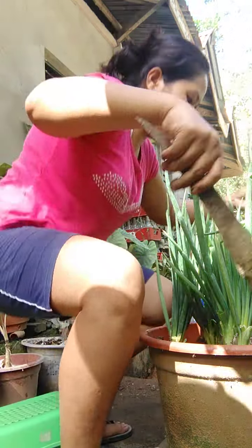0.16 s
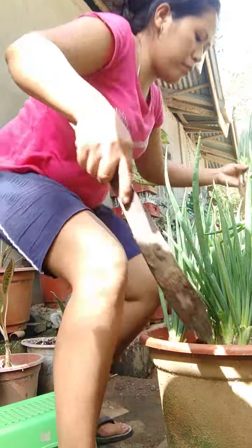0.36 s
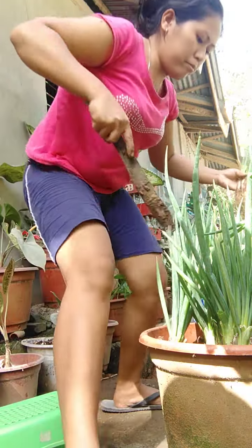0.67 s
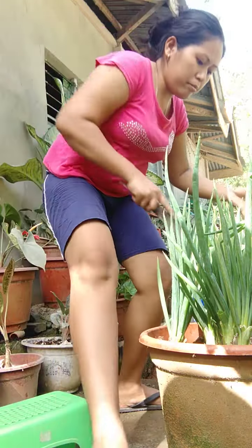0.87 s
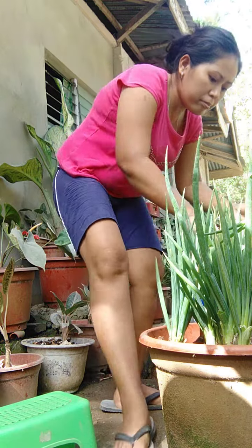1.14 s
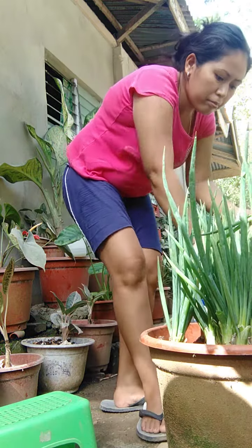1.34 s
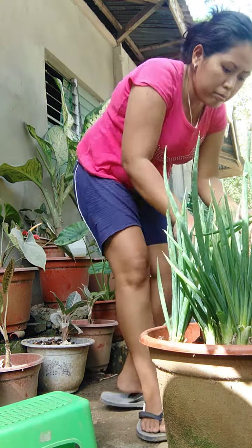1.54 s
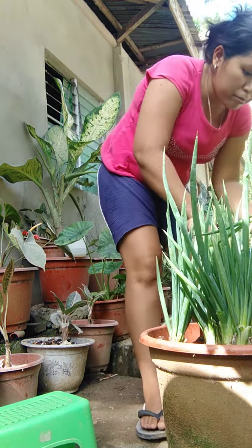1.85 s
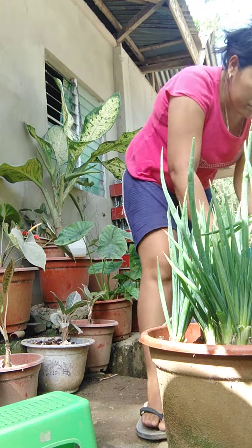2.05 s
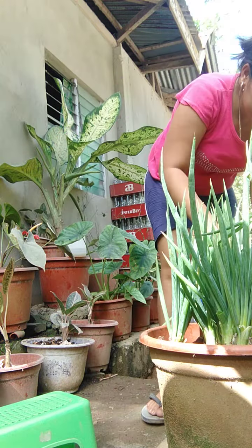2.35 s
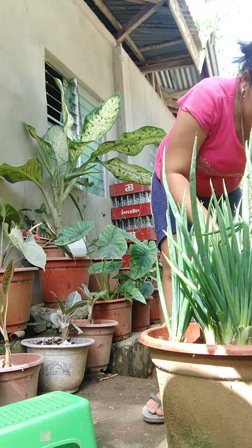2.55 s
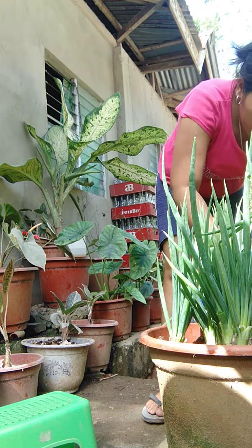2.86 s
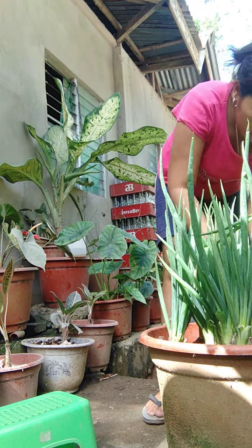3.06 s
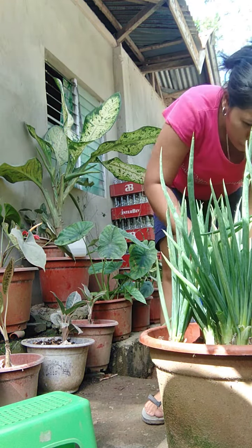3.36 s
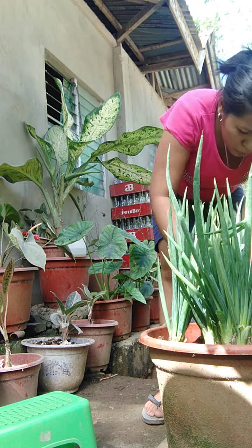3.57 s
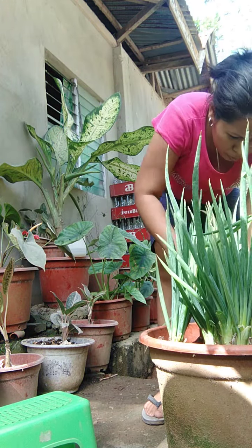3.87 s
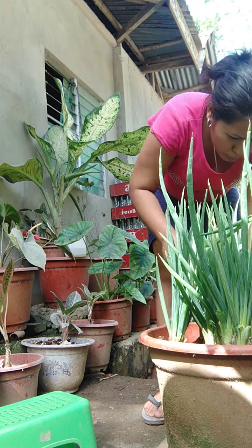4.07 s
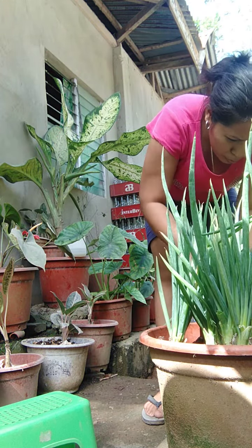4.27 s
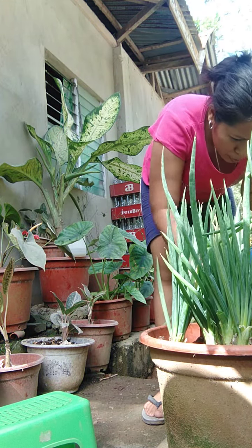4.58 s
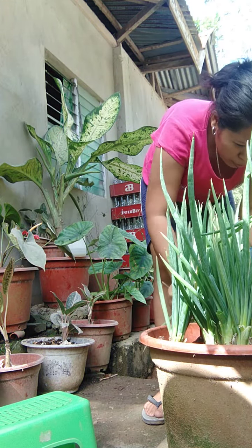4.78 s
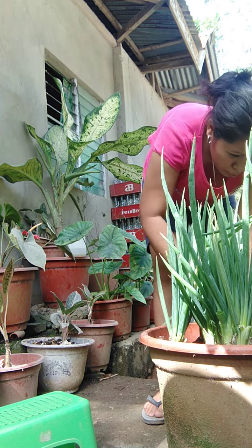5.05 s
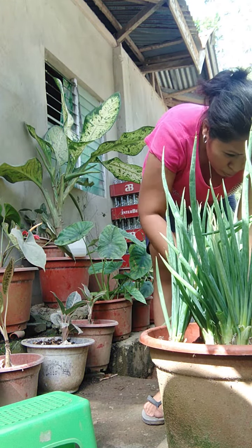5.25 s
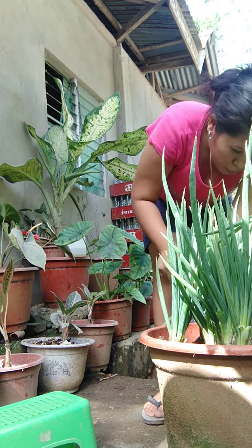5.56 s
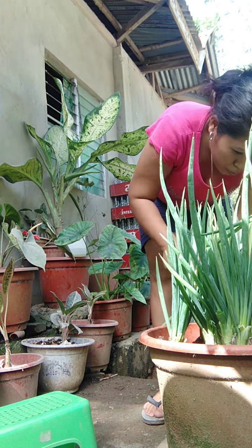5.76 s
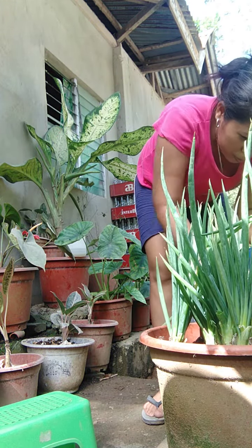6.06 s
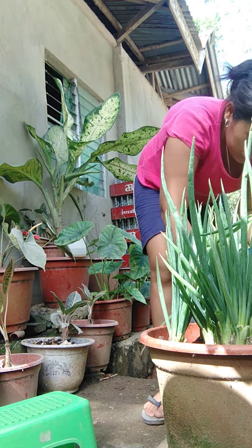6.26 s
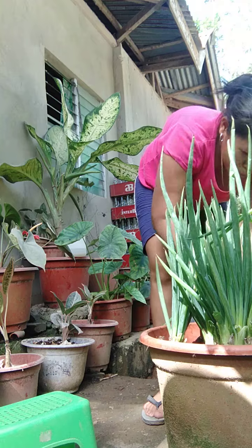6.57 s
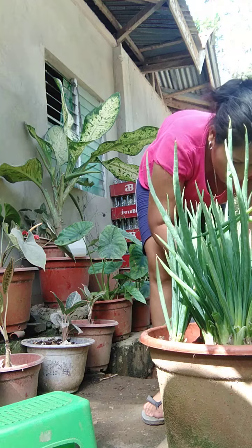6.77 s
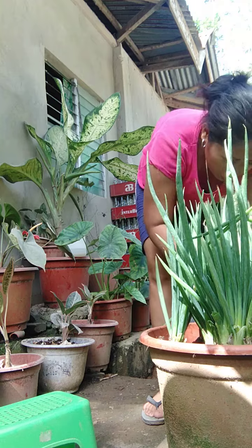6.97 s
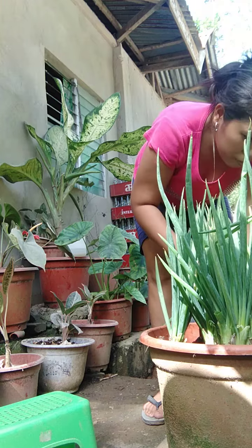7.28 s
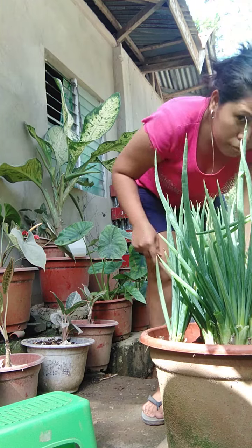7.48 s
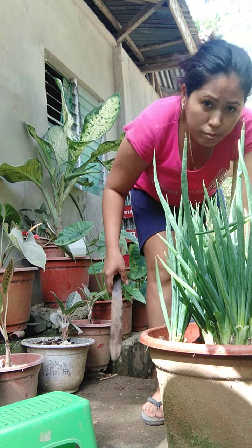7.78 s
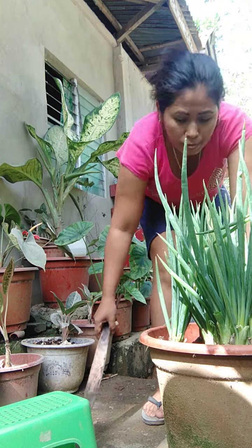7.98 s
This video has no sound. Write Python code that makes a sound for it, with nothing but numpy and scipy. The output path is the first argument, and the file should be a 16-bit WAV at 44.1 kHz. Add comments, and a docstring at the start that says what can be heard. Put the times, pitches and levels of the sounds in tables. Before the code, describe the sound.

A lumpy low exhaust chug, about twenty-eight beats a second, approaches outdoors, passes with rattly pops and rolling hiss, then drops in speed and recedes. A distant smooth motor gradually climbs. Close by, plant stalks crackle and snap early on and again near the end, lightly echoing off a wall. Brief thin bird whistles and a low hum sit beneath. The phone microphone sounds muffled and noise-suppressed between events.

```python
"""A slow, thumping engine passes a garden beside a house and throttles down: a train of exhaust pulses rings
rows of pipe resonances, with noise for valve clatter and tyres. Further off a smoother engine, a few gliding
sine orders, gathers speed. Close to the microphone leaves rustle (crackling noise) and a few dry snaps
(short noise bursts over a knock) ring off the wall; small birds chirp in gliding whistles over a low hum and
hazy exhaust roar. A phone with noise suppression listens."""
import sys
import numpy as np
from scipy import signal
from scipy.fft import rfft, irfft, next_fast_len
from scipy.io import wavfile
from scipy.ndimage import uniform_filter1d, minimum_filter1d, map_coordinates

SR = 44100
rng = np.random.default_rng(int(sys.argv[2]) if len(sys.argv) > 2 else 0)


def persist_wave(psi):
    """Save psi, clipped to +-1, as 16-bit WAV."""
    counts = np.round(np.clip(psi, -1, 1) * 32767).astype(np.int16)
    wavfile.write(sys.argv[1], SR, np.atleast_2d(counts).T)


def voltage_ratio(level):
    """Linear amplitude factor for a level in decibels (scalar or array-like)."""
    return 10 ** (np.asarray(level, float) / 20)


N = 358312

# colour of leaves and stalks: hz, relative density_db (dB per Hz)
LEAF_COLOUR = [(880, -53.5), (1500, 9.5), (1920, 3.5), (2330, 6.5), (3010, 1), (4070, 8.5), (6520, 3.5),
               (7400, 8.5), (10000, -5.5), (15600, -15)]


def unit(x):
    """Bring to rms 1."""
    return x / np.sqrt(np.mean(x ** 2) + 1e-20)


def along(points, hz):
    """Read (Hz, value) points on a log frequency axis."""
    f, v = np.transpose(points)
    return np.interp(np.log(hz + 1), np.log(f + 1), v)


def curves(rows):
    """One value per sample for each column after the time."""
    s, *cols = np.transpose(rows)
    return [np.interp(np.arange(N) / SR, s, c) for c in cols]


def wobble(rate):
    """A smooth random curve, rate knots a second."""
    knots = rng.standard_normal(int(N * rate / SR) + 4)
    return map_coordinates(knots, [np.arange(N) * rate / SR])


def filtered(x, response):
    """x times a complex response of frequency."""
    m = next_fast_len(len(x) + SR // 2)
    return irfft(rfft(x, m) * response(np.fft.rfftfreq(m, 1 / SR)), m)[:len(x)]


def modes(table):
    """Causal response of a row of resonances (Hz, width Hz, dB), alternating in sign."""
    def response(f):
        total = 0
        for k, (centre, width, db) in enumerate(table):
            total = total + (-1) ** k * voltage_ratio(db) * 1j * f * width / (centre * centre - f * f + 1j * f * width)
        return total
    return response


def highpass(f, corner_hz):
    """First-order response that thins out everything below the corner."""
    return 1j * f / (corner_hz + 1j * f)


def hiss(spectrum, n=N):
    """Coloured noise of rms 1."""
    return unit(filtered(rng.standard_normal(n), lambda hz: voltage_ratio(along(spectrum, hz))))


def patchy(x, depth_db):
    """x with random patches of gain, some 250 Hz by 100 ms, brought to rms 1."""
    z = signal.stft(x, nperseg=512)[2]
    field = uniform_filter1d(rng.standard_normal(z.shape), size=3, axis=0)
    field = uniform_filter1d(field, size=18, axis=1)
    return unit(signal.istft(z * voltage_ratio(depth_db * unit(field)), nperseg=512)[1][:N])


def hump(s, rise, fall):
    """Squared distance from a peak in units of its rise and fall (at least 5 ms), on a 1 ms grid."""
    t = np.arange(0, N / SR + .002, .001)
    return ((t - s) / np.where(t < s, max(rise, .005), max(fall, .005))) ** 2


def fine(x):
    """From the 1 ms grid to samples."""
    return np.interp(np.arange(N) / SR * 1000, np.arange(len(x)), x)


def yard(x):
    """The answer of wall and roof: a noise tail in which each frequency dies at its own speed."""
    # echo time of the yard: hz, t60_s
    yard_t60 = [(100, .5), (1000, .5), (5000, .7), (14000, .3)]
    hz, t, z = signal.stft(rng.standard_normal(SR), SR, nperseg=1024)
    tail = signal.istft(z * voltage_ratio(-60 * t / along(yard_t60, hz)[:, None]), SR, nperseg=1024)[1]
    return signal.fftconvolve(x, tail / np.linalg.norm(tail))[:N]


def street():
    """Low hum and hazy exhaust roar, distant traffic and trees, road roar left behind: all coloured noise."""
    # low hum and hazy exhaust roar: hz, relative density_db (dB per Hz)
    hum_colour = [(18, -35.5), (30, -13), (80, -9), (138, -3), (170, -5.5), (315, -29.5), (400, -22.5),
                  (520, -28.5), (880, -120)]
    # low hum and hazy exhaust roar, ahead of a slow wobble: time_s, level_db
    hum_level = [(0, -37), (1, -38), (2, -35.5), (3.3, -30), (4.7, -30), (5.5, -36.5), (6.5, -37),
                 (7.2, -36), (8.12, -52)]
    # distant traffic and trees: hz, relative density_db (dB per Hz)
    air_colour = [(250, -31), (400, -31), (600, -2), (1000, -3.5), (1400, -8.5), (2400, -10.5),
                  (2900, -15.5), (4500, -14.5), (7500, -16.5), (10000, -23), (15600, -62)]
    # distant traffic and trees, ahead of a slow wobble: time_s, level_db
    rush_level = [(0, -47.5), (1.2, -49), (2.5, -47.5), (5, -44), (6.6, -43), (7.4, -47.5), (7.7, -48),
                  (8.12, -53)]
    # road roar left behind: hz, relative density_db (dB per Hz)
    roar_colour = [(500, -45), (750, -19.5), (950, 0.5), (1350, 1), (1900, -2.5), (2600, -6), (3200, -63)]
    # road roar left behind: time_s, level_db
    roar_level = [(0, -65.5), (6.3, -79), (7, -51.5), (7.5, -46), (8.12, -44.5)]
    hum = voltage_ratio(curves(hum_level)[0] + 4.8 * wobble(2.993)) * hiss(hum_colour)
    rush = voltage_ratio(curves(rush_level)[0] + 0.25 * wobble(2.4)) * patchy(hiss(air_colour), depth_db=1.8)
    roar = voltage_ratio(curves(roar_level)[0]) * patchy(hiss(roar_colour), depth_db=1.5)
    return hum + rush + roar


def birds():
    """Small birds: gliding, slightly rough whistles, heard mostly as echo."""
    # chirps: start_s, length_s, from_hz, to_hz, level_db (ahead of the direct and echo shares)
    chirps = [(0.138, 0.046, 4530, 4170, -52.5), (0.161, 0.018, 7980, 7940, -57),
              (0.501, 0.039, 4140, 3675, -59.5), (0.879, 0.004, 4340, 4210, -51),
              (1.679, 0.0304, 4720, 3640, -57), (6.157, 0.17, 4730, 7720, -51.5),
              (7.55, 0.08, 4850, 4930, -54), (7.603, 0.13, 4980, 7070, -48)]
    out, rasp = np.zeros(N + SR), wobble(400)
    for s, length, from_hz, to_hz, db in chirps:
        u = np.arange(round(length * SR)) / (length * SR)
        hz = from_hz + (to_hz - from_hz) * np.sin(1.2 * u) / np.sin(1.2)  # the glide slows towards its end
        hz = hz + 160 * np.roll(rasp, -round(s * SR))[:len(u)]
        swell = np.sin(np.pi * u ** 0.69) ** .5
        out[round(s * SR):][:len(u)] += voltage_ratio(db) * swell * np.sin(2 * np.pi * np.cumsum(hz) / SR)
    return 0.94 * out[:N] + 1.32 * yard(out[:N])


def far_engine():
    """A smooth drone of three low orders and a faint sixth, each flickering a little on its way over the roofs."""
    # far engine: time_s, firing_pitch_hz, first_order_db, second_order_db
    far_run = [(0, 47.5, -48, -36.5), (1.2, 51.2, -47, -37.5), (2.1, 61, -35.5, -45),
               (2.7, 66.4, -27.5, -43), (3.3, 72.2, -25, -41.5), (3.9, 77.84, -25.5, -32.5),
               (4.5, 81.9, -27, -35), (5.1, 86, -23.5, -43), (5.7, 90, -26, -72), (6.4, 92.6, -25, -75.5),
               (6.9, 94.5, -25.5, -81), (8.12, 99, -28, -50.5)]
    hz, first_db, second_db = curves(far_run)
    turn = 2 * np.pi * np.cumsum(hz) / SR
    third_db = second_db - 1.1 * np.maximum(hz - 59, 0)  # the third order fades as it revs
    sixth_db = first_db - 34 - .5 * np.maximum(hz - 82, 0) - 4 * np.maximum(hz - 94, 0)
    drone = voltage_ratio(sixth_db + 3 * wobble(5)) * np.sin(6 * turn + .4 * wobble(8))
    for order, db in enumerate((first_db, second_db, third_db), 1):
        tone = np.sin(order * turn + .15 * wobble(3))
        drone = drone + np.sqrt(2) * voltage_ratio(db + 1.2 * wobble(4)) * tone
    return drone


def rustle():
    """Brushed leaves: noise broken into fine crackle; each stroke swells to a rounded peak and fades."""
    # strokes: peak_s, level_db, swell_s, fade_s (each to 20 dB down, none under 5 ms)
    strokes = [(0.529, -55, 0.017, 0.033), (.72, -50, 0.044, 0.17), (1.075, -49, 0.013, 0.084),
               (1.148, -57.5, 0.038, 0.017), (1.3, -47, 0.075, 0.066), (1.426, -44, 0.087, 0.048),
               (1.531, -48.5, 0.037, 0.042), (1.661, -53.5, .05, 0.031), (1.905, -51, 0.012, 0.11),
               (2.069, -48.5, 0.12, 0.055), (2.32, -48.5, 0.11, 0.12), (2.41, -45.5, 0.11, 0.14),
               (6.57, -54.5, 0.069, 0.08), (6.81, -61, 0.03, 0.057), (7.03, -54, 0.054, 0.16),
               (7.25, -48, 0.065, 0.087), (7.779, -54, 0.018, 0.1)]
    stroke = fine(sum(voltage_ratio(db - 20 * hump(s, swell, fade)) for s, db, swell, fade in strokes))
    crackle = voltage_ratio(2.5 * wobble(70) + 3.2 * wobble(500))
    return stroke * unit(patchy(hiss(LEAF_COLOUR), depth_db=3) * crackle)


def ticks():
    """Tiny dry ticks of stalks: bright noise that dies within milliseconds."""
    # ticks: start_s, level_db (all 7 dB lower in the sound)
    stalk_ticks = [(0.399, -42), (0.5237, -42), (0.6784, -30.5), (0.7432, -32), (1.1338, -49),
                   (1.3349, -44), (1.3763, -28.5), (1.6691, -32), (1.8996, -45), (6.5744, -46),
                   (6.8144, -63), (7.0219, -49), (7.0707, -50), (7.2304, -52), (7.4884, -41), (7.755, -42)]
    t60_s = 0.016
    out, t = np.zeros(N + SR), np.arange(SR // 20) / SR
    for s, db in stalk_ticks:
        out[round(s * SR):][:len(t)] += voltage_ratio(db - 7.0 - 60 * t / t60_s) * hiss(LEAF_COLOUR, len(t))
    return out[:N]


def snaps():
    """A sharp crack of noise with a hissing echo, and a dull knock of soil and pot under it."""
    # snaps: start_s, level_db (cracks lie 9.5 dB lower), knock_db (over level_db, before the common lift),
    # echo_t60_s (at least 0.02), thinness (0-6 and over, negative as 0; more takes away more of the lows)
    snap_rows = [(0.401, -44, 10, 0.43, 6.1), (0.535, -40, 23.5, 0.13, 1), (0.679, -26, 13, 0.12, 1.9),
                 (0.749, -44, 30, 0.95, 0.65), (1.136, -33, -5, 0.12, 1.6), (1.2481, -37, -21, 1, 10),
                 (1.3327, -25, 10.5, 0.027, 5.5), (1.3746, -35.5, 20, 0.084, 2),
                 (2.6862, -27.5, -40, 0.39, 3.8), (3.2414, -31.5, 5, 0.82, 5.7),
                 (7.492, -32.5, 17.5, 0.37, 2.2), (7.7524, -35, -10, 0.58, 7), (7.888, -51, -21, 0.47, 2.6),
                 (7.9409, -23.5, -27, 0.38, 5.16)]
    # crack: hz, relative density_db (dB per Hz)
    crack_colour = [(1180, -59), (2000, 1), (2290, 28.5), (2870, 12), (3130, 20), (4040, 12), (6710, 6.5),
                    (9550, -5.5), (12800, -19), (15600, -26)]
    # soil and pot: centre_hz, width_hz, gain_db
    knock_modes = [(240, 90, 10), (370, 70, 7), (520, 120, 7), (900, 120, 2), (1500, 900, -8)]
    knock_lift_db = 16
    out, blows, t = np.zeros(N + SR), np.zeros(N), np.arange(SR // 2) / SR
    for s, db, knock_db, t60, thin in snap_rows:
        decay = voltage_ratio(-60 * t / 0.046) + .5 * voltage_ratio(-60 * t / max(t60, .02))
        shape = decay * (1 - np.exp(-t / 0.0021))
        crack = filtered(hiss(crack_colour, len(t)),
                         lambda f: (f * f / (f * f + 3500 ** 2) + 1e-9) ** max(thin, 0))
        out[round(s * SR):][:len(t)] += voltage_ratio(db - 9.5) * shape * unit(crack)
        blows[round(s * SR)] = voltage_ratio(db + knock_db + knock_lift_db)
    return out[:N] + filtered(blows, lambda f: modes(knock_modes)(f) * 1500 / (1500 + 1j * f))


def whine():
    """Thin, slightly unsteady tones that surface briefly from the roar and sink back."""
    # thin tones: start_s, length_s, from_hz, to_hz, level_db
    thin_tones = [(3.55, .65, 482, 492, -48), (4.08, .55, 536, 530, -46), (5.06, .22, 858, 830, -45),
                  (5.58, .27, 812, 795, -47), (5.86, .16, 750, 758, -47)]
    out, drift, flutter = np.zeros(N + SR), wobble(15), voltage_ratio(3 * wobble(12))
    for s, length, from_hz, to_hz, db in thin_tones:
        u, i = np.arange(round(length * SR)) / (length * SR), round(s * SR)
        hz = from_hz + (to_hz - from_hz) * u + 3 * drift[i:i + len(u)]
        out[i:][:len(u)] += voltage_ratio(db) * np.sin(np.pi * u) ** .5 * np.sin(2 * np.pi * np.cumsum(hz) / SR)
    return out[:N] * flutter


def surges():
    """Change of level in dB as the engine fires harder or, once, softer: a quick onset, a rounded return."""
    # runs of harder or softer firing: peak_s, change_db, return_s (to 1/e of the change)
    firing_runs = [(0.308, 3, 0.096), (0.66, 4.5, 0.047), (1.185, 5.5, 0.11), (1.31, 4, 0.049),
                   (1.652, 13, 0.12), (2.006, 5, 0.091), (2.49, 5, 0.29), (2.942, 5.5, 0.15),
                   (4.192, 8, 0.2), (4.524, 6, 0.3), (4.984, 2, 0.04), (5.054, 4, 0.13), (5.414, 1.5, 0.41),
                   (6.286, 5.5, 0.14), (7.025, -2, 0.15)]
    onset_s = 0.0053
    return fine(sum(db * np.exp(-hump(s, onset_s, length)) for s, db, length in firing_runs))


def firings():
    """Sample position and size of every firing; every second one is weaker and the running is lumpy."""
    # near engine: time_s, firings_hz, weakness of every second firing (0-1)
    running = [(0, 28.66, .55), (.9, 27.9, .68), (1.3, 27.85, .66), (1.4, 27.86, .3), (1.6, 27.88, .26),
               (2.1, 28.1, .3), (2.7, 28.72, .52), (3.1, 28.75, .48), (3.5, 28.72, .32), (4.5, 28.64, .2),
               (4.85, 28.5, .25), (5.05, 28.47, .65), (5.3, 28.3, .6), (5.4, 28.2, .06), (5.7, 27.75, .04),
               (6.6, 24.7, .07), (7, 22.7, .1), (8.12, 15.5, .1)]
    # the strong and the weak firing change places: time_s
    swap_times = [.45, 1.9, 2.85, 4.5]
    rate, weak = curves(running)
    at = np.flatnonzero(np.diff(np.floor(np.cumsum(rate) / SR + .86)))
    luck = rng.standard_normal((400, 2))[:len(at)]
    second = (np.arange(len(at)) + np.searchsorted(swap_times, at / SR)) % 2
    size = np.where(second, 1 - weak[at], 1) * voltage_ratio((.6 + .9 * weak[at]) * luck[:, 0])
    scatter_s = (.00008 + .0007 * weak[at]) * luck[:, 1]  # lumpy running scatters the timing
    return np.clip(at + (scatter_s * SR).astype(int), 0, N - 1), size


def silencer_boom(pulses, thump_db):
    """The silencer's lowest resonances, rung by the pulses at a nearly steady level."""
    # silencer: centre_hz, width_hz, relative gain_db
    silencer = [(59, 4.2, -7.5), (78.9, 11.7, 4)]
    level_db = -34 + 0.087 * (thump_db - thump_db.mean())  # follows a small share of the thump's swing
    return voltage_ratio(level_db) * unit(filtered(pulses, lambda f: modes(silencer)(f) * highpass(f, 60)))


def pipe_thump(pulses, thump_db):
    """Low resonances of the exhaust pipe; the thump builds up ahead of the bark."""
    # exhaust pipe: centre_hz, width_hz, relative gain_db
    exhaust_pipe = [(106.4, 27, 6), (142.4, 17.7, 4), (190.5, 15, -10.5)]
    lead_s = .005

    def response(f):
        return modes(exhaust_pipe)(f) * np.exp(2j * np.pi * f * lead_s) * highpass(f, 90)
    return voltage_ratio(thump_db) * unit(filtered(pulses, response))


def tailpipe_bark(pulses, bark_db):
    """Each pulse rings the tailpipe mouth, thinned below and softened above."""
    # tailpipe mouth: centre_hz, width_hz, relative gain_db
    pipe_mouth = [(219, 70, 0), (280.5, 46, 0.5), (372, 40, -8), (476, 22, -14.5)]

    def response(f):
        return modes(pipe_mouth)(f) * highpass(f, 190) ** 2 / (1 + 1j * f / 500) ** 2
    return voltage_ratio(bark_db) * unit(filtered(pulses, response))


def open_pipe(pulses, surge_db):
    """The open tailpipe, dropping at 5.5 s from a higher row of resonances, facing the garden, to a lower one."""
    # pipe facing the garden: centre_hz, width_hz, relative gain_db
    facing_pipe = [(192, 5.2, -2.5), (310, 30, 2), (470, 46, -14.5)]
    # the same pipe going away: centre_hz, width_hz, relative gain_db
    turned_pipe = [(164, 21, -2), (246, 17, -1.5), (435, 61, -5.5)]
    # open tailpipe, ahead of the surges: time_s, level_db
    facing_level = [(0, -75), (3.4, -69), (3.9, -71), (4.6, -58), (5.2, -37), (5.5, -44), (6, -39),
                    (6.5, -54.5), (7, -56.5), (7.5, -59), (8.12, -83)]
    # two times in falling order, so that the colour switches at once at the second: time_s, time_s
    turn_s = 5.76, 5.5
    coming, going = (unit(filtered(pulses, lambda f: modes(pipe)(f) * highpass(f, 150) ** 2))
                     for pipe in (facing_pipe, turned_pipe))
    gone = np.interp(np.arange(N) / SR, turn_s, [0, 1])
    return voltage_ratio(curves(facing_level)[0] + surge_db) * ((1 - gone) * coming + gone * going)


def manifold(pulses):
    """Higher pipe overtones, a lower and an upper pair that come and go separately."""
    # two pairs of overtones: centre_hz, width_hz, relative gain_db
    overtone_pairs = [
        [(363, 24, -1.5), (387.5, 32, 1.5)],
        [(495, 72, 5), (593, 52, -5.5)],
    ]
    # overtones on the way: time_s, lower_pair_db, upper_pair_db
    pair_levels = [(0, -52, -67), (1.8, -67, -57.5), (2.3, -49.5, -49), (2.9, -48.5, -49.5),
                   (3.4, -44, -60), (3.8, -48, -50.5), (4.3, -45, -49), (4.8, -50.5, -55),
                   (5.2, -42.5, -42), (5.6, -46, -48.5), (6, -43.5, -46), (6.5, -62, -46),
                   (6.9, -54.5, -46), (7.3, -62.5, -56.5), (8.12, -71, -72)]
    return sum(voltage_ratio(db) * unit(filtered(pulses, lambda f: modes(pair)(f) * highpass(f, 300) ** 3))
               for db, pair in zip(curves(pair_levels), overtone_pairs))


def pop_sizes(at):
    """Level of each firing's pop in dB: a small scatter, and chosen firings set louder or softer."""
    # pops of chosen firings (the nearest takes the value), some louder and some softer: time_s, level_db
    chosen_pops = [(4.208, 11.5), (4.522, 8), (4.979, -3.5), (5.016, 5.5), (5.084, 11.5), (5.296, 1),
                   (5.402, 3), (5.438, 7.5), (5.473, 4.5), (5.58, 1.5), (5.617, -1.5), (5.653, -3),
                   (5.76, 2), (5.798, 2.5), (6.02, 3.5), (6.057, 8.5), (6.095, 5), (6.208, 2), (6.287, 0),
                   (6.364, -2.5), (6.404, 4), (6.444, -0.5), (6.525, 7), (6.565, 0), (6.811, 4),
                   (7.023, 6.5), (7.161, -4)]
    pop_db = 1.5 * rng.standard_normal(len(at))
    for s, db in chosen_pops:
        pop_db[np.argmin(abs(at + 330 - s * SR))] = db
    return pop_db


def casing_pops(at, size, pop_db):
    """Each firing rings the engine casing's modes, unequally and up to 6 ms apart; the yard answers."""
    # engine casing: centre_hz, width_hz, relative gain_db
    casing = [(790, 140, -7.5), (1010, 130, -3.5), (1333, 360, 0), (1770, 180, -5.5), (2360, 440, -4.5)]
    # modes above 1500 Hz stand out once it has passed: time_s, gain_db
    pop_bright = [(0, -4), (5.3, -1), (5.9, 2.5), (6.3, 11), (6.6, 10), (7.2, 3.5), (8.12, 9)]
    # pops on the way, ahead of the yard's answer: time_s, level_db
    pop_level = [(0, -64.5), (2.7, -58), (4.1, -86), (5, -57), (5.6, -42.5), (6.1, -53), (6.5, -57.5),
                 (7, -71.5), (7.5, -69), (8.12, -66)]
    spread_s, colour_db = .006, 5
    delay = (spread_s * SR * rng.random((len(at), len(casing)))).astype(int)
    colour = voltage_ratio(colour_db * rng.standard_normal((len(at), len(casing))))
    bright_db = curves(pop_bright)[0][at]
    pops = 0
    for mode, gain, late in zip(casing, colour.T, delay.T):
        strength = size * voltage_ratio(pop_db + (mode[0] > 1500) * bright_db) * gain
        hits = np.bincount(np.minimum(at + 280 + late, N - 1), strength, N)
        pops = pops + filtered(hits, lambda f: modes([mode])(f) / (1 + 1j * f / 3200) ** 3)
    pops = unit(pops)
    return voltage_ratio(curves(pop_level)[0]) * (pops + .6 * yard(pops))


def valve_clatter(bursts, clatter_db):
    """Patchy noise that bursts with each firing."""
    # clatter: hz, relative density_db (dB per Hz)
    clatter_colour = [(250, -85), (420, -2), (520, -3), (639, -8), (818, -7.5), (903, -10.5), (1370, -10),
                      (1660, -13), (2230, -18.5), (3000, -23.5), (3900, -37.5), (6600, -120)]
    noise = patchy(hiss(clatter_colour), depth_db=1.2)
    return voltage_ratio(clatter_db + .8 * wobble(12)) * unit(noise * (.7 + bursts))


def tyre_hiss(bursts, tyre_db):
    """Rolling tyres: steady bright noise, faintly modulated by the firings."""
    # tyres: hz, relative density_db (dB per Hz)
    tyre_colour = [(1650, -3.5), (2800, 0), (3230, 4), (3790, 3.5), (5700, 5), (6870, 4), (7440, 6.5),
                   (9700, -6), (15600, -16.5)]
    return voltage_ratio(tyre_db + 0.48 * wobble(14)) * unit(hiss(tyre_colour) * (6 + bursts))


def near_engine():
    """One exhaust pulse per firing drives boom, thump and bark; clatter and pops follow it; tyres hiss."""
    # on the way past, ahead of the surges: time_s, thump_db, bark_db, clatter_db, tyre_hiss_db
    way_past = [(0, -69, -39.5, -46, -79), (.5, -43.5, -39.5, -67, -70), (1, -33, -38.5, -76, -62),
                (1.7, -40, -59, -57, -74), (2.2, -31.5, -48, -57.5, -67), (2.7, -35.5, -45.5, -51.5, -54.5),
                (3.3, -28, -39.5, -43, -54), (3.75, -30, -53, -46, -52.5), (4.1, -32, -65, -45, -49),
                (4.9, -26, -54, -42, -47.5), (5.3, -25, -45, -42, -45.5), (5.65, -24.5, -42, -40, -44),
                (6.3, -27.5, -49, -41.5, -47), (6.6, -26, -42, -42.5, -48), (6.9, -30.5, -44, -42, -46.5),
                (7.2, -27, -46, -41, -47), (7.5, -36, -53, -44, -50.5), (7.7, -35.5, -49.5, -46.5, -47),
                (8.12, -40.5, -55, -66, -46.5)]
    thump_db, bark_db, clatter_db, tyre_db = curves(way_past)
    surge_db = surges()
    thump_db = thump_db + surge_db
    bark_db = bark_db + 1.6 * surge_db  # the bark swings wider than the thump
    clatter_db = clatter_db + 0.25 * surge_db

    at, size = firings()
    # gas leaves as a blunt puff
    pulses = filtered(np.bincount(at, size, N), lambda f: (450 / (450 + 1j * f)) ** 3)
    low = silencer_boom(pulses, thump_db) + pipe_thump(pulses, thump_db)
    bark = tailpipe_bark(pulses, bark_db) + open_pipe(pulses, surge_db) + manifold(pulses)
    echo = voltage_ratio(-16) * yard(low + voltage_ratio(3) * bark)  # the walls return more of the bark than of the low thump

    pop_db = pop_sizes(at)
    strokes = np.bincount(np.minimum(at + 330, N - 1), size * voltage_ratio(pop_db), N)
    bursts = signal.lfilter([1], [1, -np.exp(-1 / (.006 * SR))], strokes)  # each dies with a 6 ms time constant
    clatter = valve_clatter(bursts, clatter_db) + casing_pops(at, size, pop_db)
    return low + bark + echo + clatter + tyre_hiss(bursts, tyre_db)


def scene():
    """Two engines, hands among the plants, birds, a low hum with hazy exhaust roar and the far rush of air."""
    background = street() + birds() + far_engine()
    plants = rustle() + ticks() + snaps()
    return (background + plants + whine() + near_engine())[None]


def low_pass(x):
    """Removes everything above the highest recorded frequency."""
    return signal.sosfilt(signal.butter(12, 15730, fs=SR, output="sos"), x)


def record(dry):
    """A slightly bent microphone, then a suppressor closing each narrow band not far above its quiet level."""
    # rise over the quiet level that opens a band: hz, rise_db
    opening_rise = [(2400, 3.3), (3200, 6)]
    # gain of a closed band: hz, gain_db
    closed_gain = [(330, -3.5), (450, -11.5), (700, -8.5), (2500, -26.5), (3000, -26.5), (8000, -22.5),
                   (15000, -18)]
    x = dry[0] + 0.5 * dry[0] ** 2  # loud low tones mix into difference tones
    x = filtered(x, lambda f: highpass(f, 20) ** 2)
    hz, _, z = signal.stft(x, SR, nperseg=512, noverlap=384)
    power = np.abs(z) ** 2 + 1e-20
    slow = uniform_filter1d(power, size=41, axis=1)
    slow = np.abs(uniform_filter1d(slow, size=7, axis=0))
    quiet = minimum_filter1d(slow, size=1033, axis=1, origin=516)  # the lowest level of the last 3 s
    recent = signal.lfilter([.08], [1, -.92], power, axis=1)
    over_db = 10 * np.log10(recent / (quiet + 1e-20)) - along(opening_rise, hz)[:, None]
    shut = 1 / (1 + np.exp(np.clip(over_db / 1.1, -40, 40)))
    shut = minimum_filter1d(shut, size=15, axis=1, origin=5)  # a band opens at once and lingers
    gain = voltage_ratio(along(closed_gain, hz)[:, None] * uniform_filter1d(shut, size=3, axis=1))
    kept = signal.istft(z * gain, SR, nperseg=512, noverlap=384)[1]
    return low_pass(kept[None, :N])


dry = scene()
out = record(dry)
persist_wave(out)
```